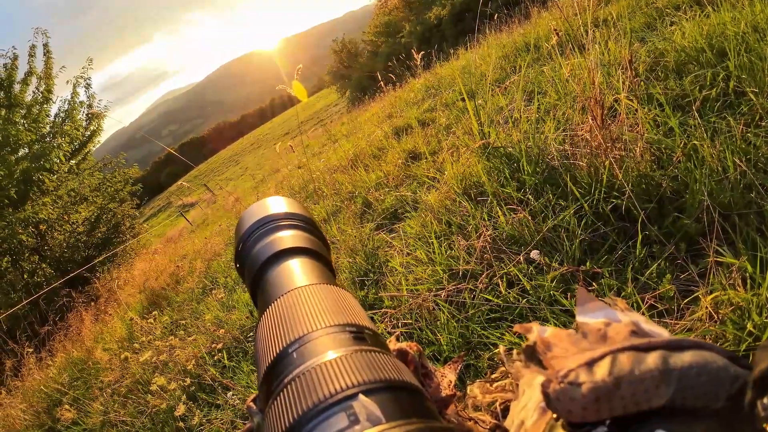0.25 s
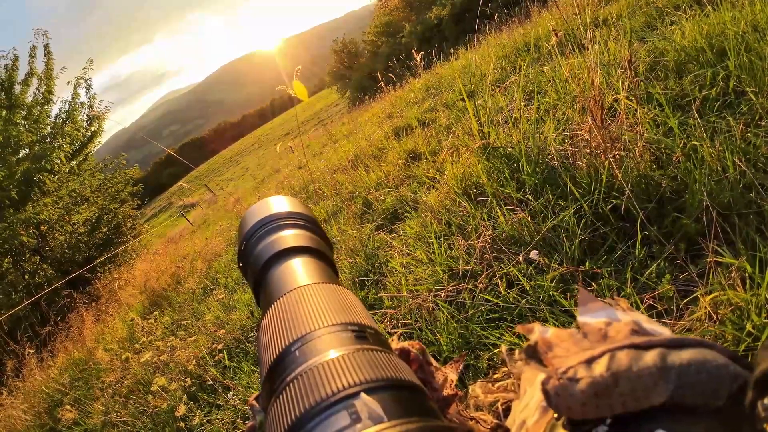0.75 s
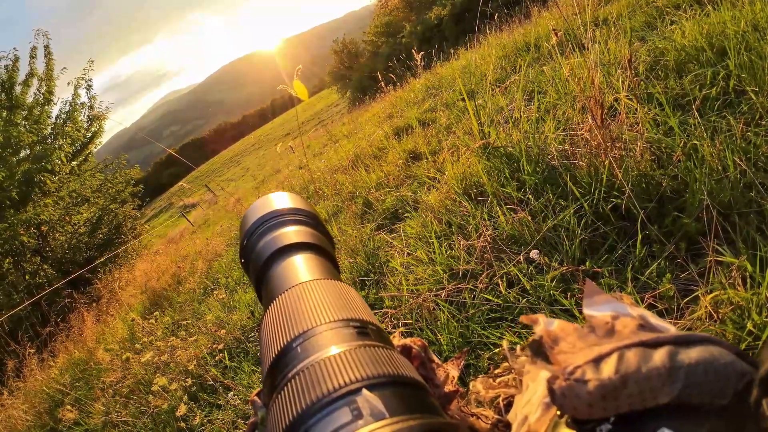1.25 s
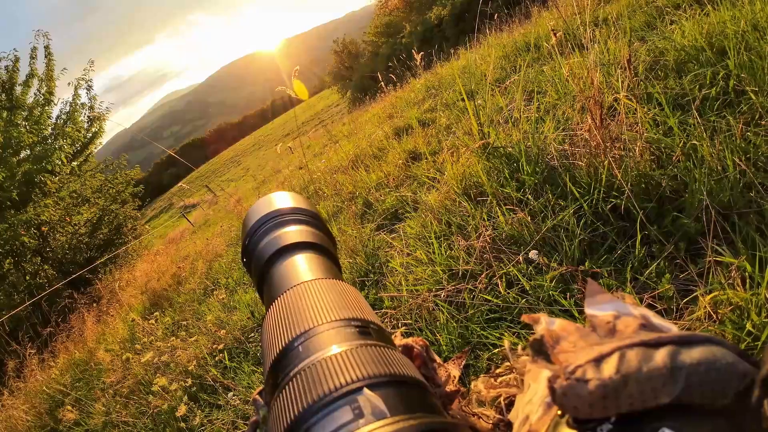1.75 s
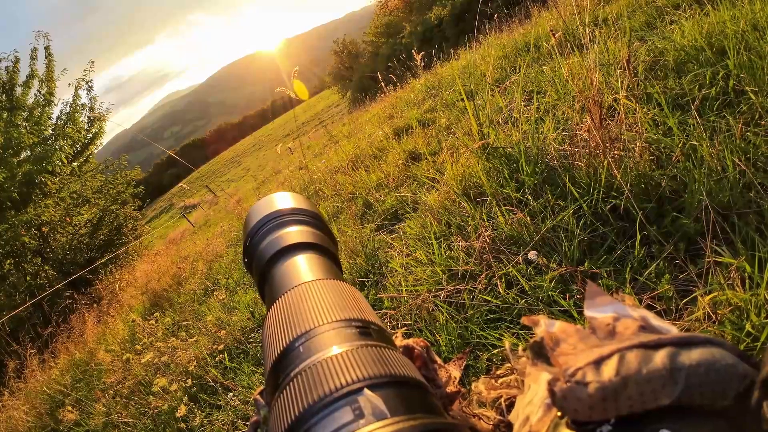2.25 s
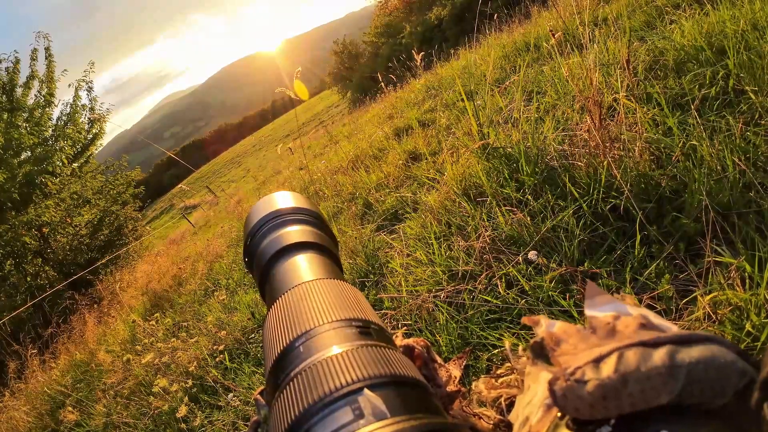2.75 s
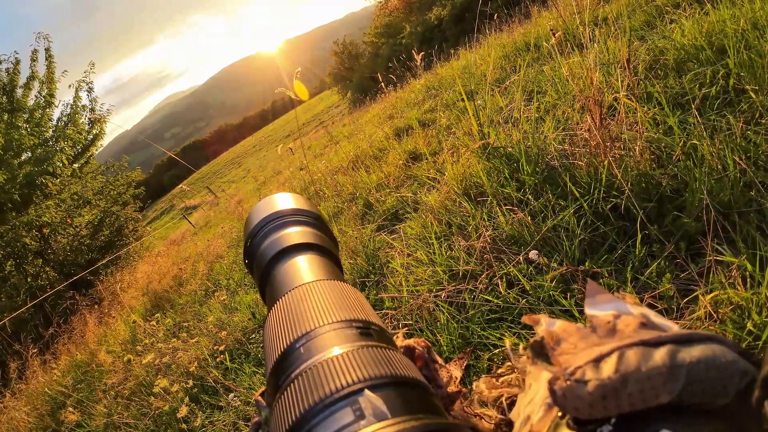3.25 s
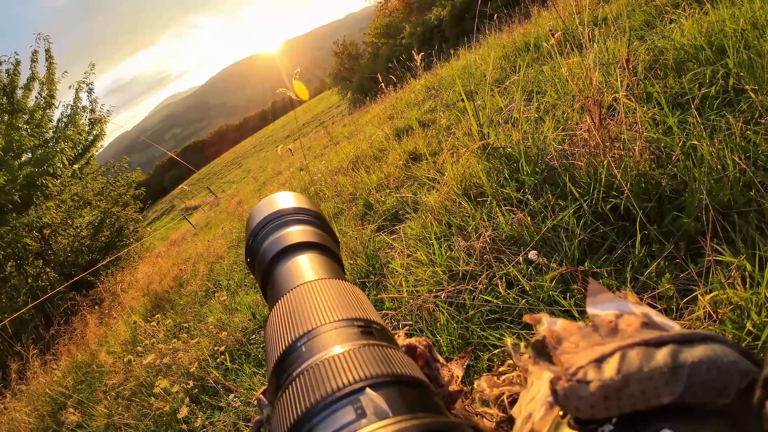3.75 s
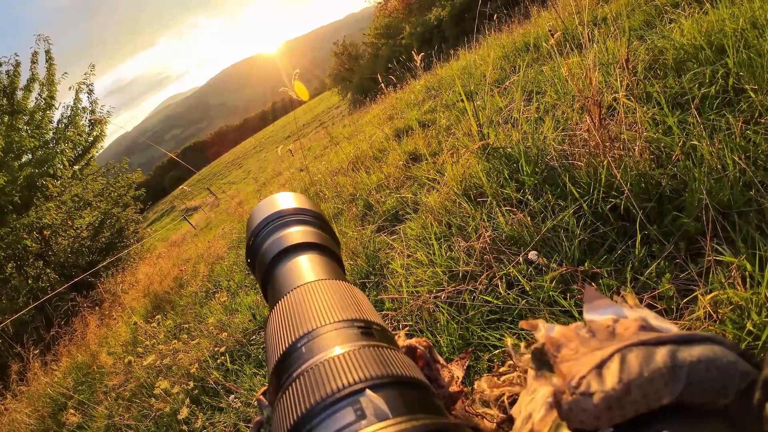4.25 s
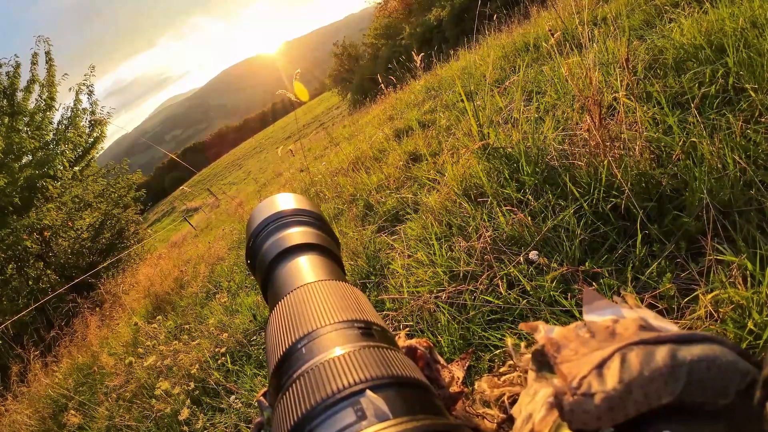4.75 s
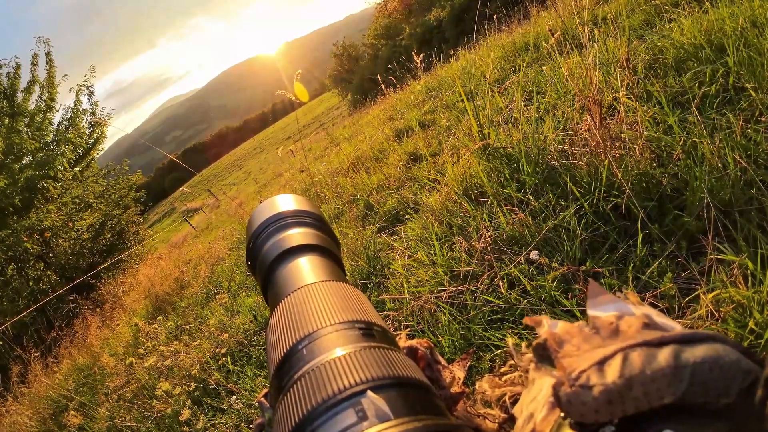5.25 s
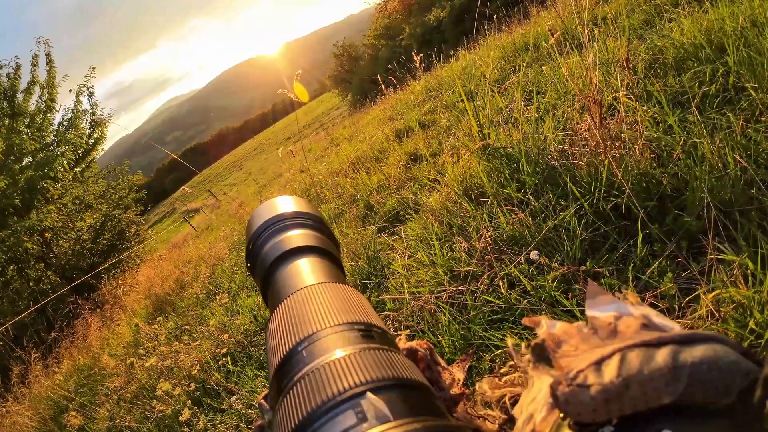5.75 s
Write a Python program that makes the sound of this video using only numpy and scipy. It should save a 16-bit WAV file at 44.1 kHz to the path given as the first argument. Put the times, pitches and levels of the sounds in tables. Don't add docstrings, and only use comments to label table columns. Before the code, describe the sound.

Outdoor close stereo sound of a camera being handled: small hollow focus knocks and tiny bright switch pings in clusters, with a few deep muffled bumps stronger on the left. Three hard, dry shutter clacks, one alone and later a quick pair, each trail into a brief grainy winding rattle. The air is calm, with faint hiss and low wind buffeting that swells into a final gust.

```python
import sys
import numpy as np
from scipy import signal
from scipy.fft import rfft, irfft, next_fast_len
from scipy.io import wavfile
from scipy.ndimage import map_coordinates

SR = 44100
rng = np.random.default_rng(int(sys.argv[2]) if len(sys.argv) > 2 else 0)


def dump_mix(stems):
    frames = np.atleast_2d(stems).T
    limited = np.clip(frames, -1, 1)
    pcm = np.round(limited * 32767).astype(np.int16)
    wavfile.write(sys.argv[1], SR, pcm)


def rack_gain(trim_db):
    fader = np.asarray(trim_db, float)
    return 10 ** (fader / 20)


N = 265041

# freq_hz, level_db
MEADOW_SPECTRUM = [(60, -31.5), (110, -7), (380, -4.5), (750, -9), (1500, -15), (3500, -21.5), (5200, -21),
                   (8500, -29), (11500, -32), (12500, -39.5), (14300, -43), (14900, -39), (16000, -35),
                   (16600, -76.5)]
# time_s, level_db
MEADOW_LEVEL = [(0, -71), (.64, -72.5), (1.38, -70.5), (2.55, -71.5), (3.05, -68), (3.56, -72.5),
                (4.4, -72), (5.35, -70.5), (6.01, -70.5)]
# freq_hz, correlation
MEADOW_LIKENESS = [(60, -0.015), (130, 0.45), (290, 0.98), (640, 0.44), (1410, 0.23), (3100, 0.17),
                   (6820, -0.3), (15000, -0.031)]
# time_s, level_db
BUFFET_LEVEL = [(0, -55), (.8, -54.5), (.97, -60), (1.15, -56.5), (1.7, -54.5), (3.25, -55), (3.75, -59.5),
                (4.05, -56), (4.45, -53.5), (4.9, -50), (5.4, -53.5), (5.75, -54.5), (6.01, -51.5)]
# freq_hz, level_db
BUFFET_SPECTRUM = [(6, -2.5), (14, 9.5), (28, 2), (45, -5.5), (65, -4.5), (100, -13), (150, -13.5),
                   (220, -22.5), (400, -61.5)]
# start_s, peak_s, level_db
GUST_PUFFS = [
    (5.6, 5.724, -43),
    (5.787, 5.844, -34.5),
    (5.88, 5.976, -36.5),
]
# freq_hz, level_db
GUST_SPECTRUM = [(8.8, -37), (15, 3), (57, 2.5), (117, -14), (158, -14.5), (189, -43), (300, -38),
                 (390, -68), (660, -120)]
# freq_hz, side_minus_mid_db
PORT_SPREAD = [(60, 9), (110, 4.5), (200, -5.5), (380, -12), (700, -20), (1290, -19), (2380, -13),
               (4400, -9), (8120, -2.5), (15000, 1.5)]

# start_s, level_db, low_over_high_db
SWITCH_PINGS = [(0.0502, -50, -12.5), (0.7435, -63.5, 2), (0.7555, -49.5, -9), (1.1103, -47.5, -7),
                (2.2877, -56.5, 6), (2.73, -55, -9), (2.7414, -57, 6), (3.3153, -52, -5), (4.1912, -61, -5),
                (4.578, -64, 4), (5.0287, -57, -1), (5.456, -49, -13), (5.9785, -52.5, -8)]
# freq_hz, width_hz, level_db
SWITCH_PARTS = [
    [(2455, 120, 0)],
    [(3500, 380, 0.5), (4240, 780, -1)],
    [(6040, 1100, 15.5), (8300, 2400, -4), (10600, 2200, -12)],
]
# stop_s, travel_ms, start_db, slide_db, stop_db
FOCUS_MOVES = [(.078, 12.5, -46, -47.5, -58), (.094, 8.8, -70, -68, -43), (.145, 12.7, -48, -60.5, -39.5),
               (.193, 11.3, -55, -48.5, -43), (.206, 11.6, -70, -62, -43), (.359, 17.2, -49, -49.5, -33.5),
               (.587, 9, -51.5, -61, -38), (1.143, 14, -49.5, -50, -38), (1.169, 19.4, -70, -51.5, -39.5),
               (1.228, 15.3, -70, -46.5, -39), (1.268, 17, -44.5, -48.5, -35), (2.32, 11, -50, -49.5, -38),
               (2.518, 19, -46.5, -49, -35.5), (2.592, 18.7, -48, -50, -36), (3.344, 15, -45, -50.5, -36),
               (3.375, 14, -53, -51, -36.5), (3.998, 8, -45, -64, -37.5), (4.162, 21, -46, -49.5, -38.5),
               (4.331, 20.4, -47, -51.5, -38.5), (4.828, 10.7, -71, -63.5, -36.5),
               (6.003, 10, -46.5, -50, -40)]
# rattle_ms, barrel_db, body_db, bright_db
FOCUS_START = (2.14, -0.5, -10.5, -18)
FOCUS_SLIDE = (5.5, -2, -0.5, -13.5)
FOCUS_STOP = (1.9, 0.5, -13.5, -16)
# freq_hz, width_hz, level_db
LENS_BARREL = [(345, 100, -18), (650, 130, 0), (915, 390, -15.5)]
LENS_BODY = [(1350, 840, 0), (2370, 500, -1.5), (2980, 860, -14.5)]
LENS_BRIGHT = [(3540, 200, -5), (5100, 290, 2.5), (5900, 900, -3.5), (8000, 680, -8.5), (10900, 2000, -11)]

# start_s, level_db, settled_pitch_hz, swing_ms, right_port_db
HAND_BUMPS = [
    (1.2043, -27.5, 68, 9.9, -9.5),
    (1.239, -38.5, 58.5, 16, -14),
    (1.827, -27.5, 66.4, 12.4, -12),
    (1.86, -46, 49.7, 15, -20),
    (1.929, -46, 56, 23, -17),
    (4.1485, -30.5, 65.2, 9.6, -10),
    (4.172, -42, 66.6, 25, -22),
]
# level_db, settled_pitch_hz, swing_ms, right_port_db
MIRROR_JOLT = [-29, 90.5, 7.5, -12]

# release_s, motor_s, last_cams_s, strength_db
EXPOSURES = [
    (2.6220, 2.7765, 2.9062, 0),
    (4.4590, 4.6133, 4.7467, .3),
    (4.9014, 5.0666, 5.1977, .3),
]
# after_stage_s, rattle_ms, strength_db, hardness_db, part struck
RELEASE_CONTACTS = [(-.003, 2.3, -39.5, 1, "even"), (-.0003, .5, -16.5, -1, "plate"),
                    (.0011, .6, -17.5, -2, "even"), (.0035, .46, -13, -0.5, "lever"),
                    (.006, 1.5, -24.5, 0, "plate"), (.0116, .8, -19, 0, "lever"),
                    (.0137, .66, -19.5, 1.5, "lever"), (.0174, .92, -19.5, -2, "housing"),
                    (.0195, 1, -25, -5, "even"), (.027, 2.3, -28.5, -5, "housing"),
                    (.0385, 1, -37.5, 1, "even"), (.0406, 1, -21, -1, "even"),
                    (.0425, 1, -30.5, 1.5, "even"), (.0443, .8, -17, 4.5, "housing"),
                    (.0463, .92, -27, 1, "even"), (.048, 1.5, -28.5, -3.5, "even"),
                    (.059, 2, -45, 2, "plate")]
RECOCK_CONTACTS = [(-.001, 2, -36.5, -2.5, "even"), (.003, 2, -29, -4, "housing"),
                   (.009, 1.6, -37, 1.5, "housing"), (.0273, 0.87, -41, -8.5, "plate"),
                   (.0296, .5, -35, 8, "lever"), (.036, 3.6, -40.5, -2, "even"),
                   (.052, 3.6, -40, -7, "even"), (.0642, 1.2, -34.5, -7.5, "even"),
                   (.073, .9, -29.5, 1.5, "even"), (.0786, 0.57, -21.5, 0, "spring"),
                   (.081, 1.5, -32.5, 3.5, "lever"), (.086, .8, -29, -5.5, "even"),
                   (.0885, 1.1, -32, 1, "even"), (.094, 6.2, -39, -10, "housing"),
                   (.1017, 0.97, -29, 1, "even"), (.109, 2, -31.5, 4.5, "housing"),
                   (.122, 1.2, -38.5, 0, "housing")]
SETTLE_CONTACTS = [(0, 1.274, -33.5, -0.5, "even"), (.005, 2, -34, -11, "even"),
                   (.012, 3.73, -37.5, -26, "housing"), (.0235, .97, -30.5, 3, "even"),
                   (.0265, 1.6, -34.5, -3, "even"), (.067, 2.23, -40.5, -1.5, "even"),
                   (.0735, 2.65, -39, -25, "housing")]
SHAKEN_PARTS = {"even": (0.58, -1.5, -2.2, -2), "housing": (0.5, -10.5, -11.5, -12),
                "plate": (-10, 1, -5, -7), "lever": (-11, -2.5, -1.5, -6.5), "spring": (-6.5, -8, -9.5, 0)}
HARDNESS_SHARE = (0.013, 0.4, 0.94, 1)
# freq_hz, width_hz, level_db
HOUSING_MODES = [(260, 1000, -19), (630, 620, -10.5), (1040, 220, -1), (1400, 450, -7.5)]
PLATE_MODES = [(1830, 140, -1.5), (2364, 230, 3), (2870, 270, -11.5)]
LEVER_MODES = [(3400, 310, 1.5), (4290, 600, -4.5)]
SPRING_MODES = [(5100, 550, 3), (5820, 1000, -1.5), (8140, 910, -8.5), (9940, 590, -8),
                (11660, 1100, -13.5), (15500, 800, -24.5)]
# freq_hz, width_hz, level_db
CURTAIN_MODES = [(3440, 550, -1), (4520, 480, -2)]
# after_s, level_db
LOAD_AFTER_RELEASE = [(.05, -57.5), (.1, -71.5)]
LOAD_WINDING = [(-.04, -72), (-.036, -60.5), (.013, -49.5), (.045, -52), (.095, -48)]
LOAD_COASTING = [(0.029, -50), (0.074, -60), (.115, -99)]
# freq_hz, width_hz, level_db
GEAR_MODES = [(980, 380, 2), (1800, 500, -3.5), (2390, 260, 2), (3360, 680, -6), (4340, 640, -8.5),
              (5400, 570, -8), (10000, 5000, -29.5)]

CONTACT = np.hanning(7) / 2


def unit(x):
    return x / np.sqrt(np.mean(x ** 2) + 1e-20)


def along(points, hz):
    f, v = np.transpose(points)
    return np.interp(np.log(hz + 1), np.log(f + 1), v)


def curve(points, outside=None):
    s, v = np.transpose(points)
    return np.interp(np.arange(N) / SR, s, v, outside, outside)


def wobble(rate):
    knots = rng.standard_normal(int(N * rate / SR) + 4)
    return map_coordinates(knots, [np.arange(N) * rate / SR])


def filtered(x, response):
    n = x.shape[-1]
    m = next_fast_len(n + SR // 2)
    return irfft(rfft(x, m) * response(np.fft.rfftfreq(m, 1 / SR)), m)[..., :n]


def ringing(x, modes):
    def response(f):
        h = 0
        for k, (centre, width, db) in enumerate(modes):
            damping = 1j * f * width
            h = h + (-1) ** k * rack_gain(db) * damping / (centre * centre - f * f + damping)
        return h / np.sqrt(np.mean(abs(h) ** 2))
    return filtered(x, response)


def rush(spectrum, alike):
    def gain(hz):
        turn = np.arccos(np.clip(along(alike, hz), -1, 1)) / 2
        return rack_gain(along(spectrum, hz)) * [np.cos(turn), np.sin(turn)]
    mid, side = filtered(rng.standard_normal((2, N)), gain)
    return unit(np.array([mid + side, mid - side]))


def strikes(rows, parts, swell, blow, scatter_db):
    out, t = np.zeros((2, N + 4096)), np.arange(2048) / SR
    rings = np.array([ringing(signal.unit_impulse(len(t)), modes) for modes in parts])
    for s, rattle, *part_db in rows:
        u = t / rattle
        burst = u ** swell * np.exp(-u) * rng.standard_normal((2, len(t)))
        crest = round(swell * rattle * SR)
        burst[0, crest:][:len(CONTACT)] += blow * np.linalg.norm(burst[0]) * CONTACT
        shaken = signal.fftconvolve(burst[None], rings[:, None], axes=2)
        energy = np.sum(shaken ** 2, 2, keepdims=True)
        shaken /= np.sqrt(energy / (0.0011 * SR))
        level = rack_gain(np.array(part_db) + scatter_db * rng.standard_normal(len(parts)))
        out[:, round(s * SR):][:, :shaken.shape[2]] += np.tensordot(level, shaken, 1)
    return out[:, :N]


def at_ports(mid_side):
    mid = mid_side[0]
    side = filtered(mid_side[1], lambda hz: rack_gain(along(PORT_SPREAD, hz)))
    return np.array([mid + side, mid - side])


def meadow_hiss():
    level_db = curve(MEADOW_LEVEL) + 4 + 0.8 * wobble(2.3)
    return rack_gain(level_db) * rush(MEADOW_SPECTRUM, MEADOW_LIKENESS)


def buffeting():
    lean_db = np.outer([0.5, -0.5], [3])
    lumps = rack_gain(1.6 * np.array([wobble(7), wobble(7)]))
    pressure = unit(lumps * rush(BUFFET_SPECTRUM, [(30, -0.2), (150, -0.16)]))
    return rack_gain(curve(BUFFET_LEVEL) + 5 + lean_db) * pressure


def switch_pings():
    middle_db = -4.5
    rows = [(s - 0.0005, 0.0008, db - 1 + low_db, db - 2 + middle_db, db - 2.5)
            for s, db, low_db in SWITCH_PINGS]
    return strikes(rows, SWITCH_PARTS, swell=0.56, blow=0.45, scatter_db=0.5)


def focus_drive():
    slide_lag_s = 0.0056
    lens = (LENS_BARREL, LENS_BODY, LENS_BRIGHT)

    def row(s, db, phase):
        rattle_ms, *part_db = phase
        return (s, rattle_ms / 1000, *(db + np.array(part_db)))

    steps, slides = [], []
    for stop_s, travel_ms, start_db, slide_db, stop_db in FOCUS_MOVES:
        start_s = stop_s - travel_ms / 1000
        steps.append(row(start_s - 0.001, start_db - 2.5, FOCUS_START))
        steps.append(row(stop_s - 0.001, stop_db - 5.5, FOCUS_STOP))
        slides.append(row(start_s + slide_lag_s, slide_db, FOCUS_SLIDE))
    knocks = strikes(steps, lens, swell=0.97, blow=0.8, scatter_db=2.5)
    return knocks + strikes(slides, lens, swell=1.5, blow=0.04, scatter_db=2.5)


def mount_bumps():
    mirror_lag_s, port_lag_s, pitch_fall_s = 0.0425, 0.0025, 0.008
    out, t = np.zeros((2, N + SR)), np.arange(SR // 4) / SR
    lag = round(port_lag_s * SR)
    jolts = [(release + mirror_lag_s, *MIRROR_JOLT) for release, *_ in EXPOSURES]
    for s, db, hz, ms, right_db in [*HAND_BUMPS, *jolts]:
        u = t / ms * 1000
        cycles = hz * (t + 1.5 * pitch_fall_s * (1 - np.exp(-t / pitch_fall_s)))
        slap = 0.44 * rack_gain(-60 * t / 0.026) * np.sin(2 * np.pi * 310 * t)
        sway = 1.8 * u ** 0.31 * np.exp(-u * u / 2) * np.sin(2 * np.pi * cycles)
        swing = rack_gain(db) * (slap - sway)
        start = round(s * SR)
        out[0, start:][:len(t)] += swing
        out[1, start + lag:][:len(t)] += rack_gain(right_db) * swing
    return out[:, :N]


def contacts(stage, column):
    rows = []
    for shot in EXPOSURES:
        for s, ms, db, hard_db, part in stage:
            part_db = shot[-1] + db + np.array(SHAKEN_PARTS[part]) + hard_db * np.array(HARDNESS_SHARE)
            rows.append((shot[column] + s, ms / 1000, *part_db))
    return rows


def shutter_release():
    parts = (HOUSING_MODES, PLATE_MODES, CURTAIN_MODES, SPRING_MODES)
    return strikes(contacts(RELEASE_CONTACTS, 0), parts, swell=0.6, blow=0.3, scatter_db=0.14)


def gear_train():
    effort = 0
    for shot in EXPOSURES:
        load = []
        for start, stage in zip(shot, (LOAD_AFTER_RELEASE, LOAD_WINDING, LOAD_COASTING)):
            load += [(start + s, db) for s, db in stage]
        effort = effort + rack_gain(curve(load, outside=-120))
    teeth = unit(rack_gain(3.3 * wobble(320)) * rng.standard_normal((2, N)))
    return rack_gain(1.5) * effort * ringing(teeth, GEAR_MODES)


def recocking():
    cams = contacts(RECOCK_CONTACTS, 1) + contacts(SETTLE_CONTACTS, 2)
    parts = (HOUSING_MODES, PLATE_MODES, LEVER_MODES, SPRING_MODES)
    return strikes(cams, parts, swell=0.46, blow=0.425, scatter_db=1.5)


def last_gust():
    swell_db_per_s, drop_db_per_s = 132.5, 549.5
    t = np.arange(N) / SR
    puffs = 0
    for start, peak, db in GUST_PUFFS:
        growth_db = swell_db_per_s * np.maximum(peak - t, 0)
        outside_s = np.maximum(t - peak, 0) + np.maximum(start - t, 0)
        puffs = puffs + rack_gain(db - growth_db - drop_db_per_s * outside_s)
    return puffs * rack_gain([[4], [3]]) * rush(GUST_SPECTRUM, [(30, -0.16)])


def scene():
    air = meadow_hiss() + buffeting()
    lens = switch_pings() + focus_drive()
    bumps = mount_bumps()
    shutter = shutter_release() + gear_train() + recocking()
    return air + at_ports(lens + shutter) + bumps + last_gust()


def low_pass(x):
    return signal.sosfilt(signal.butter(12, 17150, fs=SR, output="sos"), x)


def record(dry):
    top_hz = 16250
    rounded = dry / (1 + abs(dry / 0.6) ** 4) ** (1 / 4)
    limited = filtered(rounded, lambda hz: 1 / np.sqrt(1 + (hz / top_hz) ** 90))
    return low_pass(limited)


dry = scene()
out = record(dry)
dump_mix(out)
```